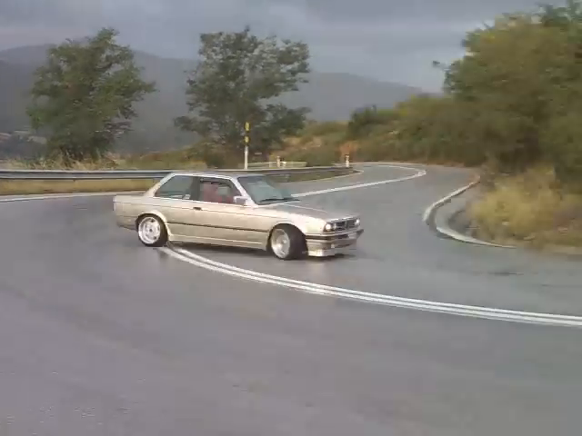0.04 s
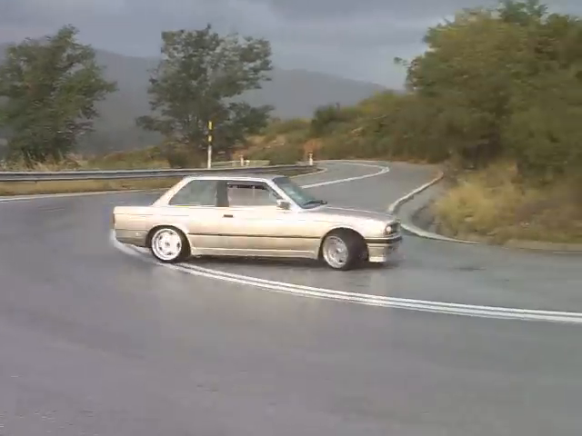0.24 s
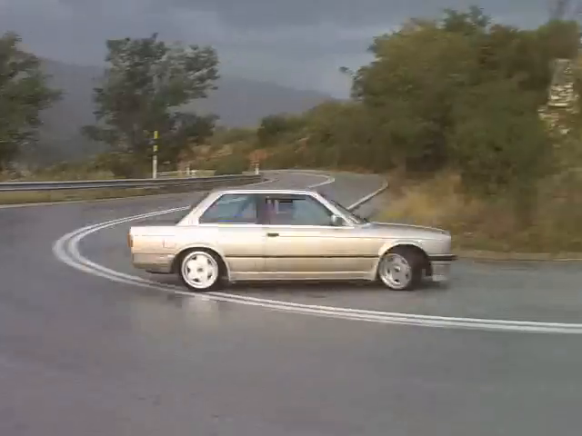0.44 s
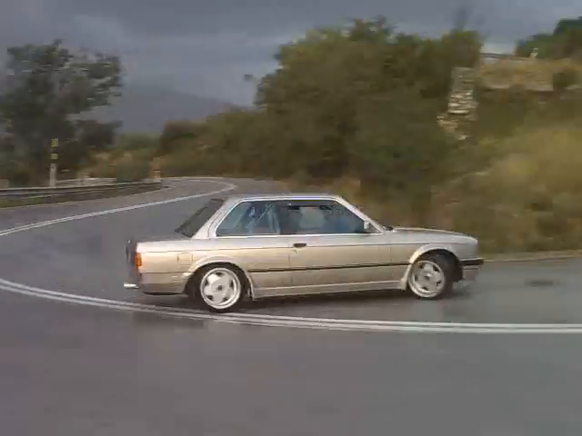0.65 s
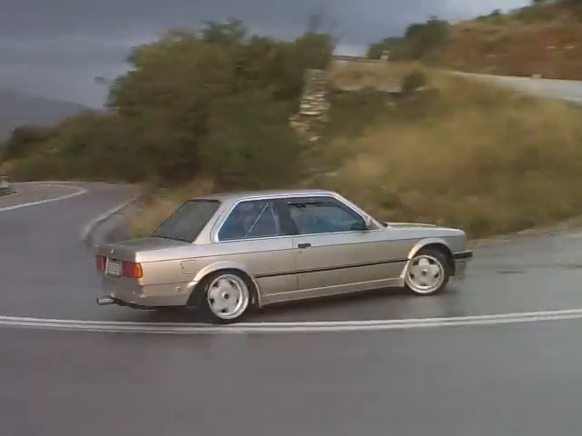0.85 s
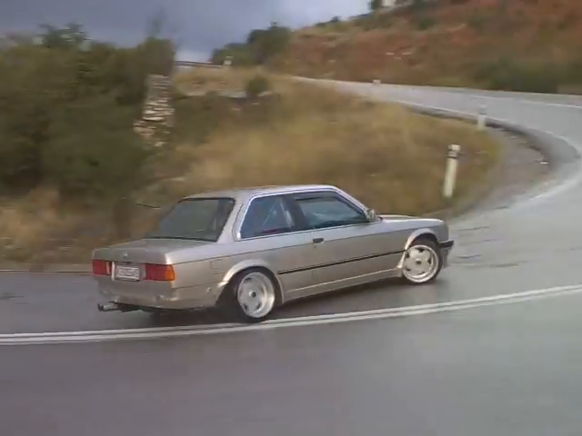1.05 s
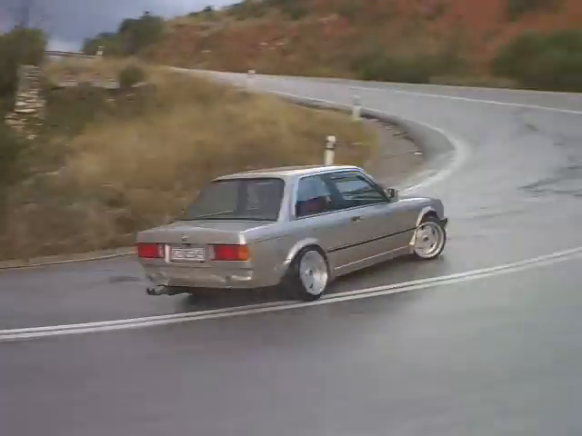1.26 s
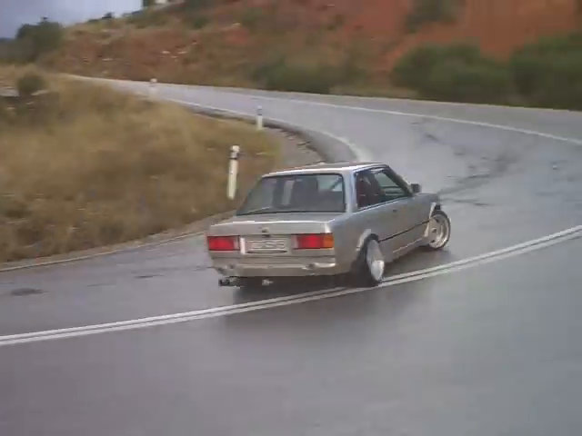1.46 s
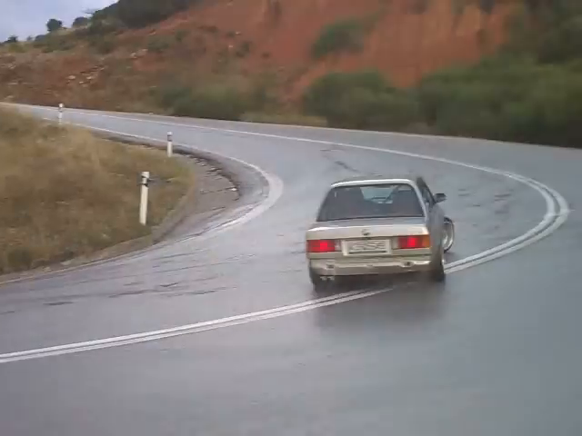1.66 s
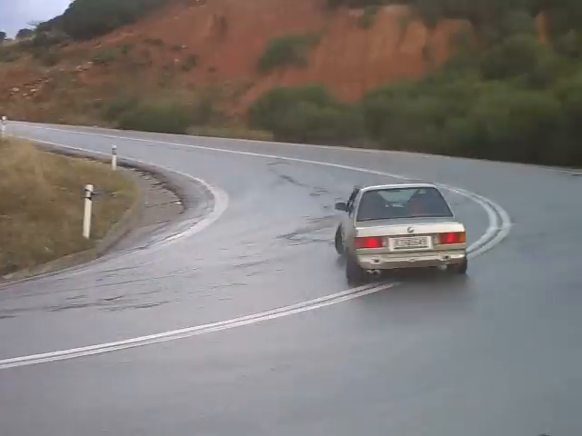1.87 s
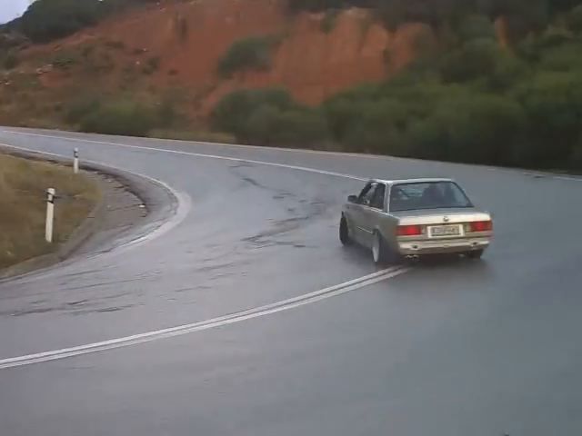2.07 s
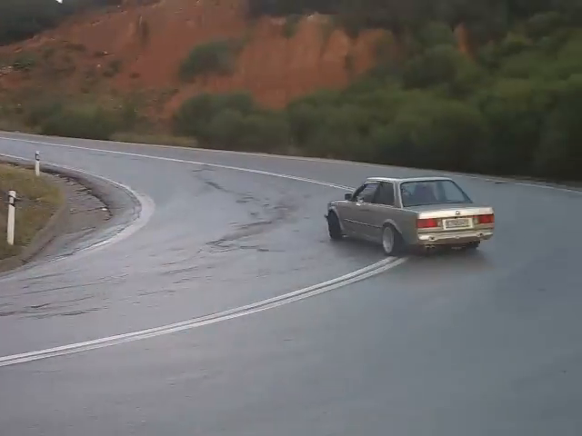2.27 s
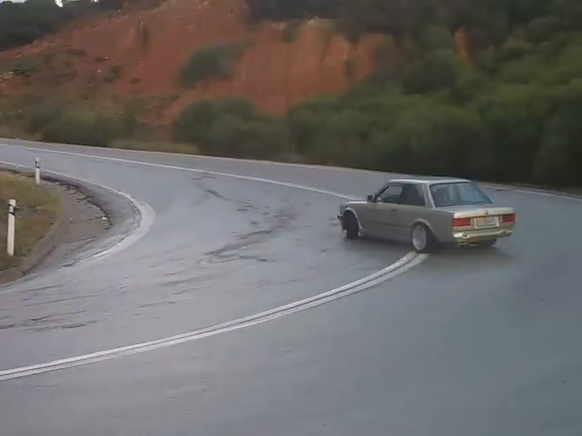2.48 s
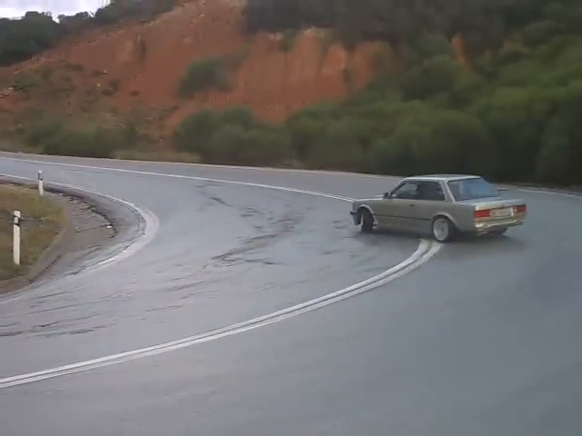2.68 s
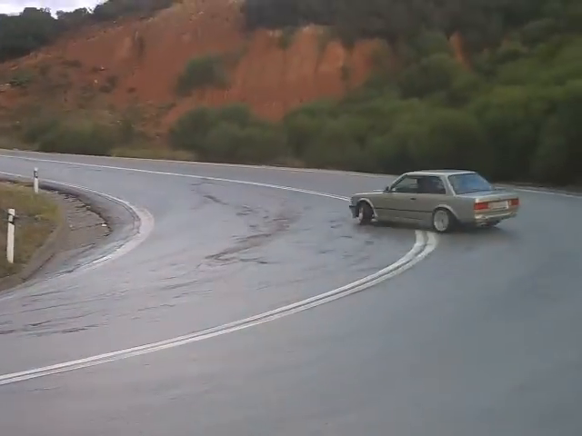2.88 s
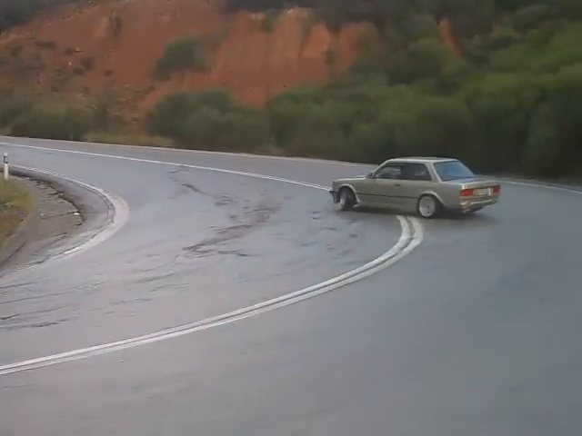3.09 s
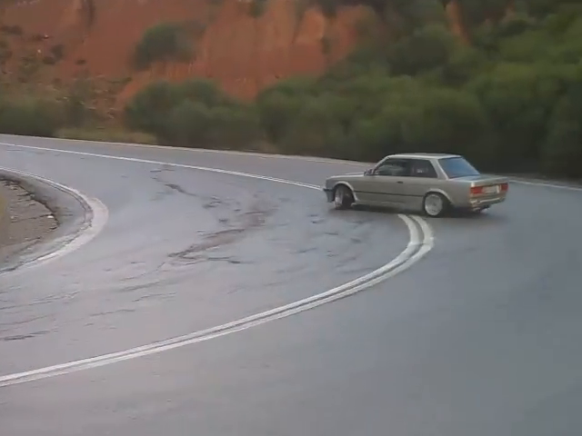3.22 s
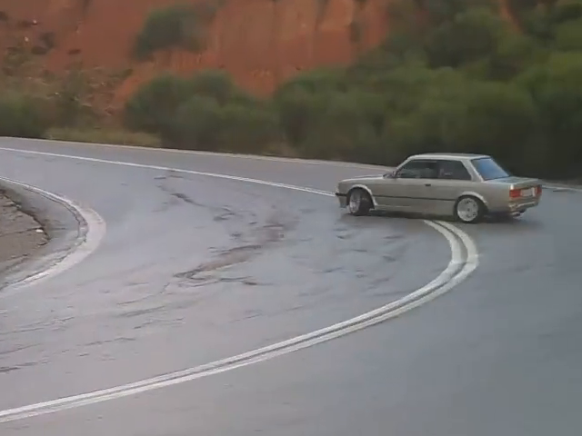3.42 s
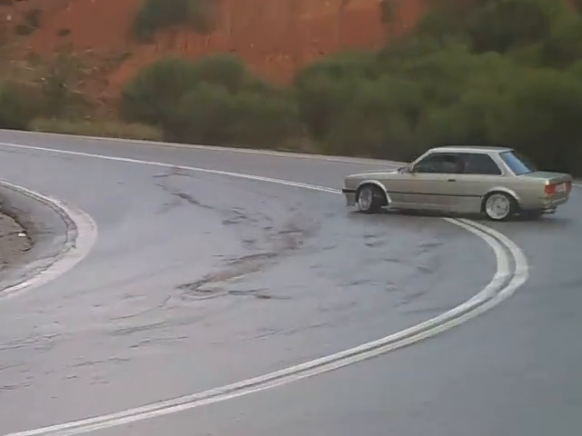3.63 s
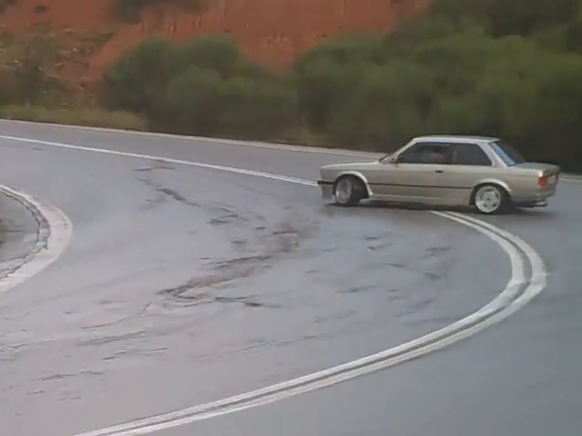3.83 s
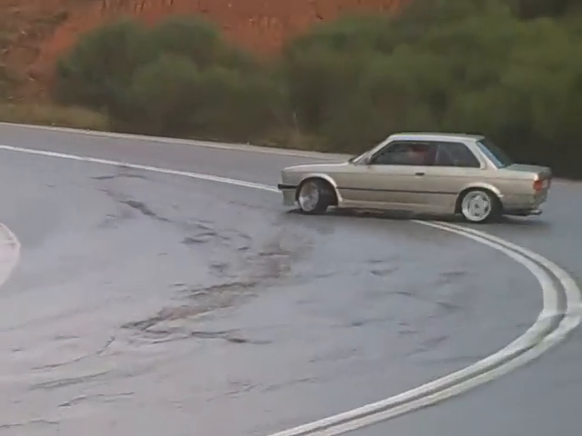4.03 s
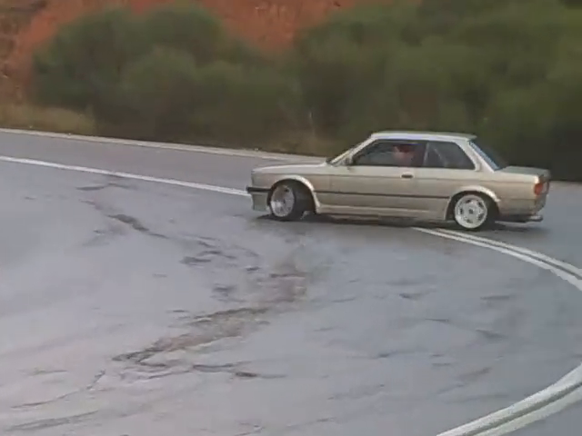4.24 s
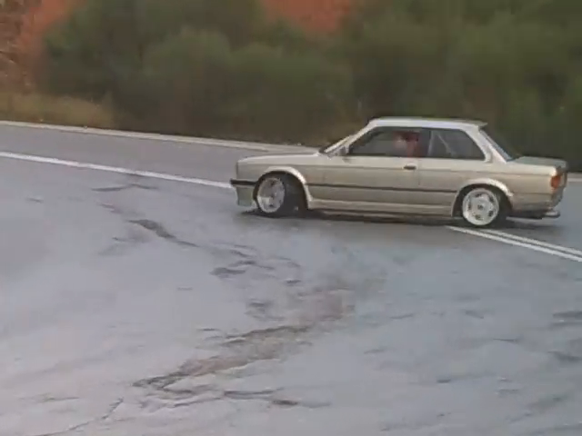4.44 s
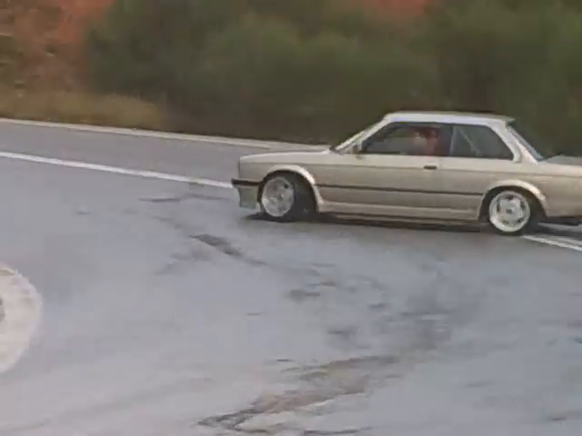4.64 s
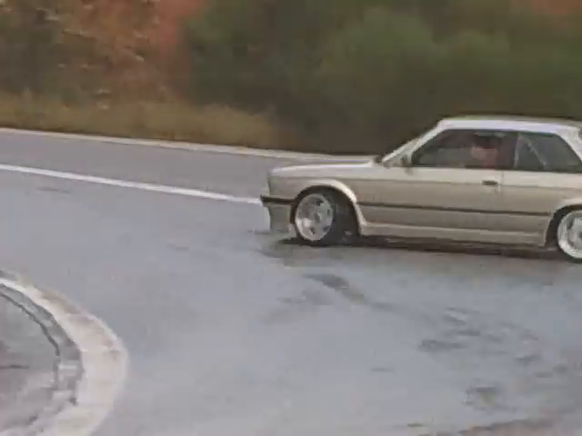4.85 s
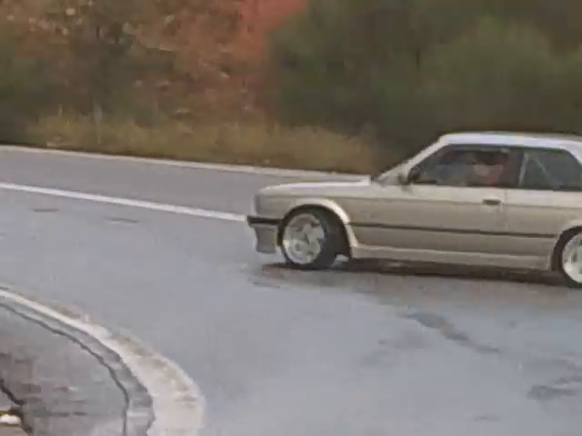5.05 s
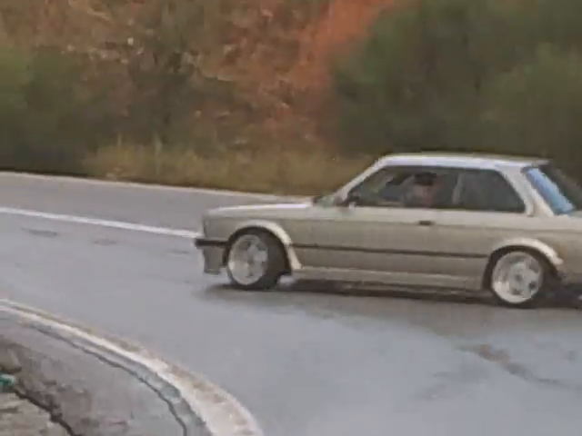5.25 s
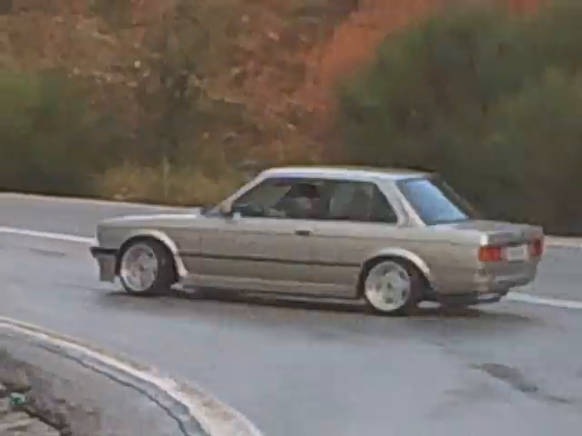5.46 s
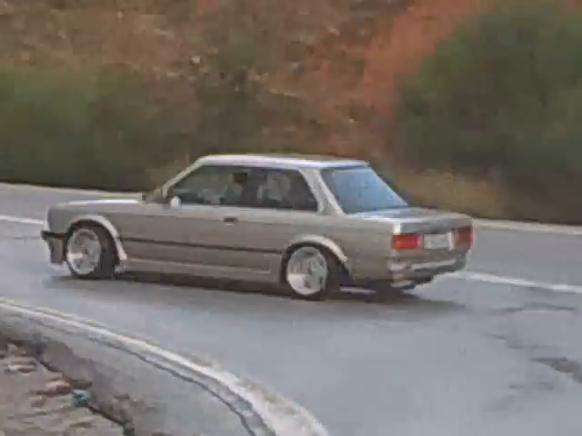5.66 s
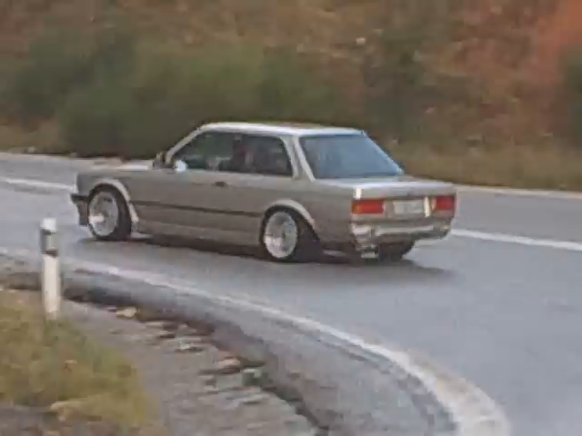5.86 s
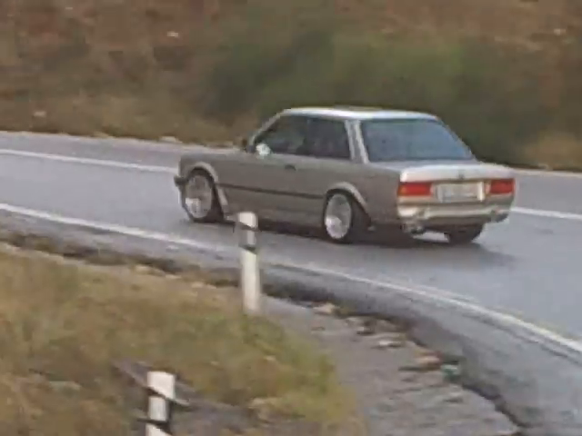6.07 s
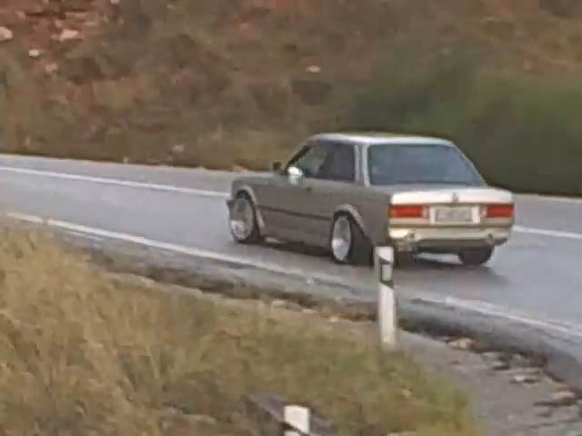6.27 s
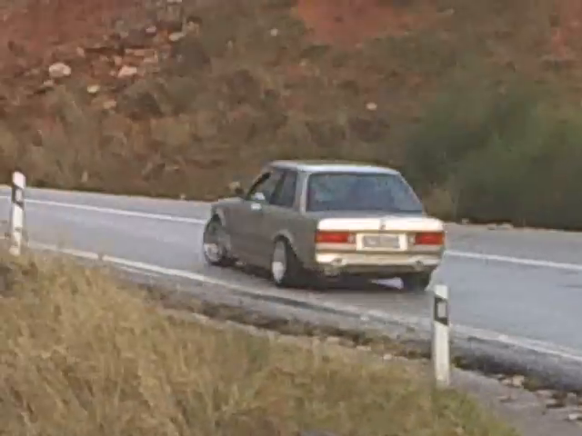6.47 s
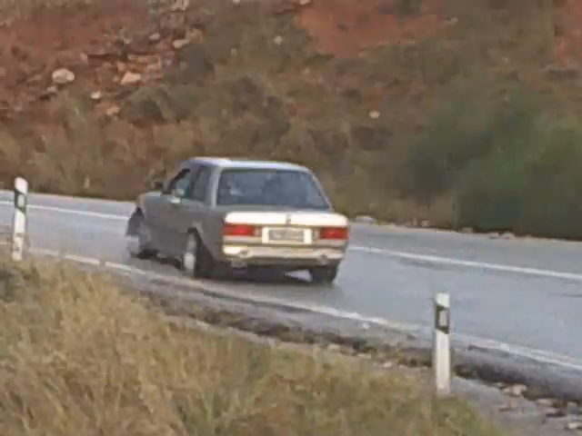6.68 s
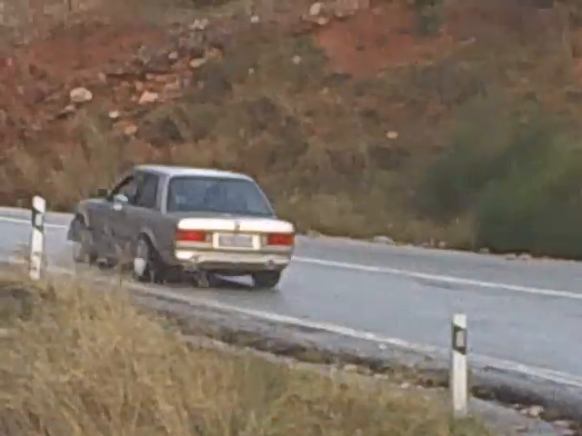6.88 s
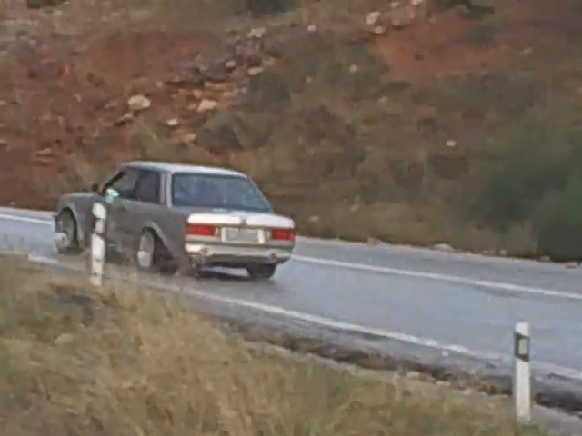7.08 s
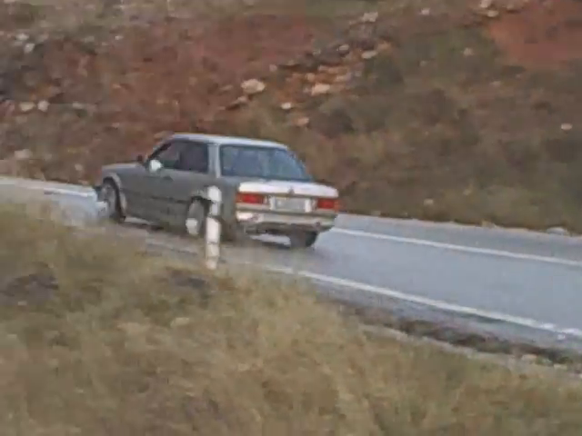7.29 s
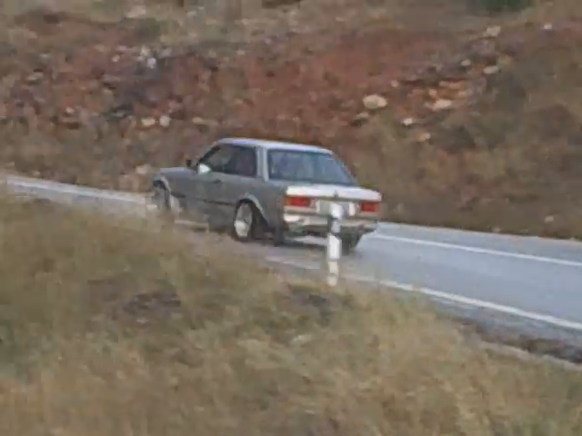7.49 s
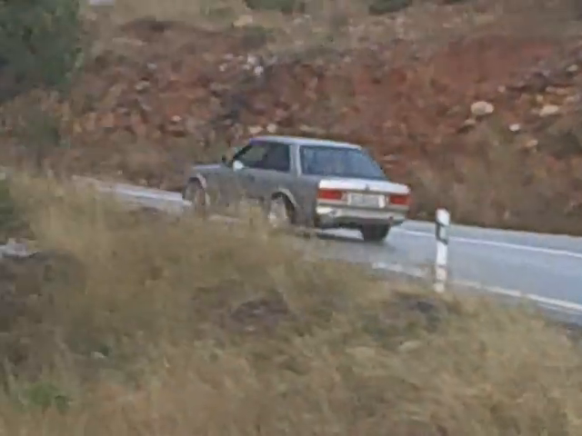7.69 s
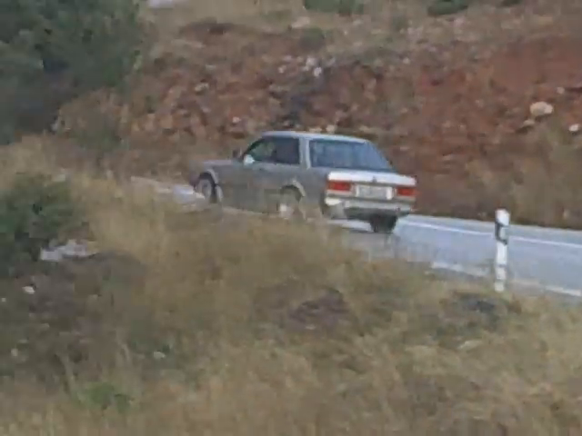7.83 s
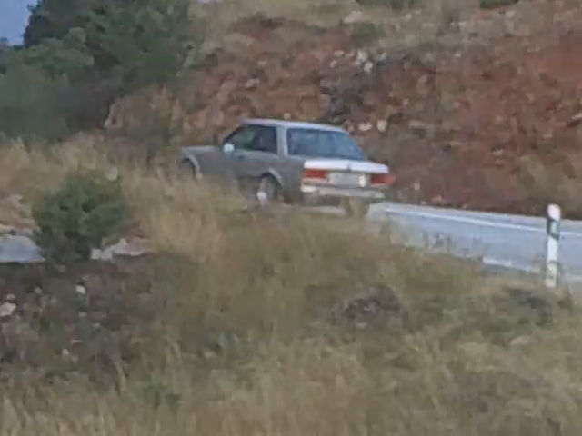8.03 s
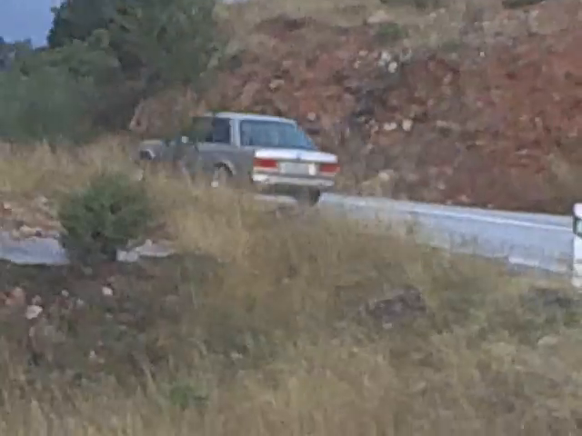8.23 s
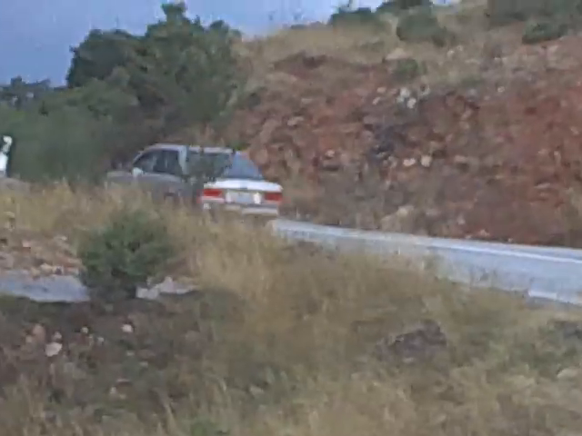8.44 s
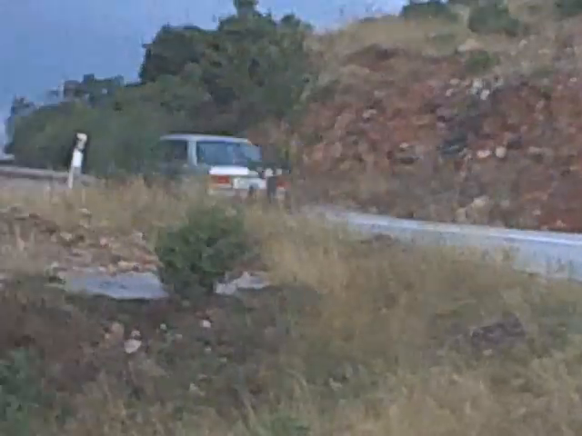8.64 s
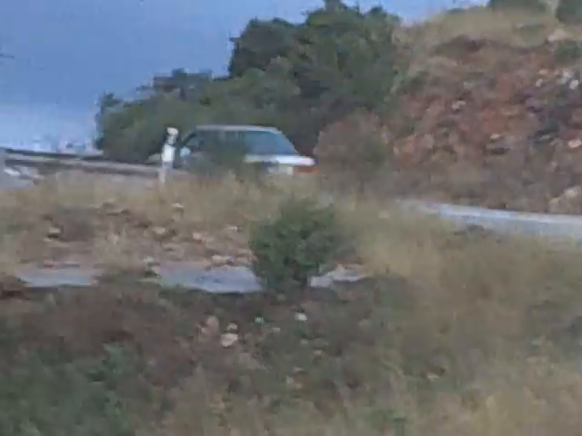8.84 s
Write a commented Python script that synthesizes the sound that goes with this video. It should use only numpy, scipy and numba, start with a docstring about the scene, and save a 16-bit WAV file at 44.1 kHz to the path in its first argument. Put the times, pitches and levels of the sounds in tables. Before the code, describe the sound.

A car drifts on a wet road, heard from the verge with dull treble and a faint outdoor echo. It opens with a short throttle blip and scrubbing tyres. From about 0.6 seconds the engine climbs with a booming, raspy exhaust, loudest between 1 and 1.8 seconds as it passes close, with tyre scrape, hissing spray and a low rumble. The exhaust sputters briefly near 1.9 seconds. Now further off, the revs dip around 2.6 seconds, climb to a peak at 3.6 with more scrubbing, then sputter and sink until 4.3. The engine rises again and holds high from about 5 to 6.5 seconds. Between 6.5 and 7.1 seconds the tyres squeal in rapid, stuttering bursts as the revs fall. From about 7.4 seconds the engine pulls gently at lower revs, quieter as the car drives away until nearly 9 seconds.

```python
"""A car drifts through a wet hairpin

A six-cylinder saloon revs up and down round the bend, then drives off uphill.
Its firings boom and rasp in the exhaust. The spinning tyres scrub and throw spray,
then squeal in bursts as they grip. The hillside gives a faint echo, and a small
camera on the verge hears it all without the high treble."""
import sys
import numpy as np
from scipy import signal
from scipy.fft import rfft, irfft
from scipy.io import wavfile
from scipy.ndimage import uniform_filter1d
from numba import njit

SR = 44100
rng = np.random.default_rng(int(sys.argv[2]) if len(sys.argv) > 2 else 0)


def pcm_store(signal):
    """Save signal as 16-bit PCM."""
    levels = np.round(np.clip(np.atleast_2d(signal), -1, 1) * 32767)
    wavfile.write(sys.argv[1], SR, levels.astype(np.int16).T)


N = 392931
TIME = np.arange(N) / SR


def undb(db):
    """Turn decibels into a gain."""
    return 10 ** (np.asarray(db) / 20)


def unit(x):
    """Scale a sound to an average (rms) level of 1."""
    return x / np.sqrt(np.mean(x ** 2))


def steady(x):
    """Even out slow changes, holding the level near 1."""
    return x / np.sqrt(uniform_filter1d(x ** 2, size=6000) + 1e-12)


def curves(table):
    """Join each column's values by straight lines in time."""
    seconds, *columns = np.transpose(table)
    return [np.interp(TIME, seconds, column) for column in columns]


def wobble(rate):
    """A random drift of size 1 that turns about rate times a second."""
    hold = max(int(SR / rate), 1)
    steps = np.repeat(rng.standard_normal(N // hold + 1), hold)
    return unit(uniform_filter1d(steps, hold)[:N])


def bursts(rows):
    """Bell-shaped swells. Each row: time in seconds, level in dB, half length in seconds."""
    power = sum(undb(2 * db) * np.exp(-np.minimum(((TIME - s) / half) ** 2, 60)) for s, db, half in rows)
    return np.sqrt(power)


def response(hz, spectrum):
    """Look up a spectrum's gain at the given frequencies."""
    points, db = np.transpose(spectrum)
    return undb(np.interp(np.log(hz), np.log(points), db))


def colour(x, spectrum):
    """Shape a sound's lows and highs with a spectrum."""
    hz = np.arange(N // 2 + 1) * SR / N + 1
    return irfft(rfft(x) * response(hz, spectrum), N)


@njit
def band_pass(x, hz, width):
    """Let through a band around a moving frequency."""
    y, band, low = np.empty(len(x)), 0., 0.
    for i in range(len(x)):
        tuning, damping = np.tan(np.pi * hz[i] / SR), width / hz[i]
        swing = (band + tuning * (x[i] - low)) / (1 + tuning * (tuning + damping))
        band = 2 * swing - band
        low += 2 * tuning * swing
        y[i] = damping * swing
    return y


def ring(x, hz, width):
    """A resonance: the same band filtered twice for steep sides."""
    centre = hz + np.zeros(N)
    return band_pass(band_pass(x, centre, float(width)), centre, float(width))


# Swells of the exhaust, under throttle or as the revs fall. Each row: start and release in seconds,
# then in dB: the note's first and last level, boom, snarl, and harmonics one and three against the note.
SWELLS = [(.14, .26, -27, -24.5, -28, -36, -2, 0.5), (0.587, 1.171, -19.5, -16.5, -22, -30.5, -7.5, 1),
          (1.107, 1.78, -7, -13, -22.5, -25, 1, -3), (1.966, 2.36, -20.5, -16, -32, -37.5, -4, -12.5),
          (2.44, 3.2, -27, -14.5, -31.5, -30, 1, -6.5), (3.173, 3.623, -22.5, -16.5, -25, -25, 1.5, 3),
          (3.753, 3.994, -29.5, -26, -33, -29, -6, -5.5),
          (4.308, 5.06, -26.5, -29.5, -35.5, -46, -3.5, -1.5),
          (5.027, 5.28, -16, -14.5, -30.5, -38, -2.5, -2.5), (5.3, 6.506, -22, -17, -32.5, -41, -2, -8.5),
          (6.724, 7.33, -31, -23, -35.5, -45, -0.5, -8.5), (7.38, 7.803, -24.5, -29, -42, -40, -0.5, -8.5),
          (7.795, 8.79, -34, -29.5, -43, -42, 3.5, -11)]


def swell_gain(first_db, last_db, coast_db):
    """Each swell rises quickly, leans from first to last, then fades to coasting."""
    rise_s, fade_s = .06, .041
    gain = undb(coast_db) + np.zeros(N)
    for (start, release, *_), first, last in zip(SWELLS, first_db, last_db):
        rise = np.clip((TIME - start) / rise_s, 0, 1)
        fade = np.exp(-np.clip((TIME - release) / fade_s, 0, 20))
        level = undb(np.interp(TIME, [start, release], [first, last]))
        gain = np.maximum(gain, rise * fade * level)
    return gain


def exhaust_gains(hz):
    """Note, boom and snarl swell together; high revs make the last two harsher."""
    _, _, first_db, last_db, boom_db, snarl_db, firing_db, third_db = np.transpose(SWELLS)
    note = [swell_gain(first_db + db, last_db + db, coast_db=-38.5 + np.mean(db))
            for db in (firing_db, 0, third_db, -17)]  # harmonics one to four
    harsh_from_hz, harsh_span_hz = 178.5, 35.3
    harsh = np.clip((hz - harsh_from_hz) / harsh_span_hz, 0, 1)
    boom = swell_gain(boom_db, boom_db, coast_db=-43) * undb(4 * harsh)
    snarl = swell_gain(snarl_db, snarl_db, coast_db=-44) * undb(12.5 * harsh)
    return note, boom, snarl


# How the exhaust pipe shapes the note. Each row: frequency in Hz, gain in dB.
PIPE = [(110, -13.5), (150, -16), (180, -16.5), (205, -8), (240, -6.5), (290, -2), (355, -1.5), (385, -3),
        (420, -3.5), (470, -17.5), (560, -22), (650, -15.5), (780, -9.5), (880, -17.5)]


def exhaust_note(hz, harmonics, gains):
    """Harmonics (multiples of the firing rate) sweep through the pipe's resonances."""
    return np.sqrt(2) * sum(gain * response(k * hz, PIPE) * wave.imag * undb(1.1 * wobble(12))
                            for k, (gain, wave) in enumerate(zip(gains, harmonics), 1))


# The six cylinders. Each row: pulse size in dB, shift in arrival time in seconds.
CYLINDERS = [(2, 0), (-3.5, .0003), (3, .00003), (-1, .00042), (0, -.00006), (-3, .00023)]


def firings(fired, scatter_db, jitter_s):
    """One pulse per firing: each cylinder has its own strength and path, plus a little chance."""
    number = np.arange(1, int(fired[-1]))
    db, lag = np.array(CYLINDERS)[number % len(CYLINDERS)].T
    chance = rng.standard_normal((len(number), 2))
    seconds = np.interp(number, fired, TIME) + lag + jitter_s * chance[:, 0]
    size = undb(db + scatter_db * chance[:, 1])
    at = np.clip(seconds, 0, TIME[-3]) * SR
    sample, share = at.astype(int), at % 1  # two samples share each pulse
    return np.bincount(sample, size * (1 - share), N) + np.bincount(sample + 1, size * share, N)


# The silencer's deep tone. Each row: frequency in Hz, gain in dB.
SILENCER = [(120, -29), (230, -12), (320, 2), (420, -3.5), (500, -9.5), (600, -16), (760, -39)]


def silencer_boom(fired, harmonics):
    """The uneven part of the pulses makes a lumpy boom."""
    pulses = firings(fired, scatter_db=3, jitter_s=.00007)
    even = sum(2 * np.real(uniform_filter1d(pulses / wave, size=2200) * wave) for wave in harmonics)
    return undb(-2.5) * steady(colour(pulses - even, SILENCER))


# The tailpipe's bright tone. Each row: frequency in Hz, gain in dB.
TAILPIPE = [(450, -37), (660, -17.5), (760, -3), (900, 1.5), (1020, 3), (1150, -10), (1350, -8),
            (1600, -19), (2000, -23.5), (2400, -11), (3200, -26.5)]


def tailpipe_snarl(fired):
    """The steep fronts of the pulses are more regular, and snarl."""
    fronts = firings(fired, scatter_db=1.4, jitter_s=.000045)
    return undb(-3) * steady(colour(fronts, TAILPIPE))


# Resonances of the gas. Each row: frequency in Hz, base width in Hz, gain in dB.
RATTLE = [(1015, 100, 2), (870, 160, -6), (1834, 240, -8.5), (2450, 380, -18)]


def gas_rattle(gas):
    """Rushing gas rattles in the tailpipe."""
    return steady(sum(undb(db) * ring(gas, hz, 1.28 * width) for hz, width, db in RATTLE))


# Engine speed. Each row: time in seconds, firings per second.
REVS = [(0, 123.8), (.15, 129.9), (.27, 146), (.55, 118), (.66, 123.2), (1.22, 180.2), (1.55, 200.7),
        (1.84, 212.2), (1.99, 188.2), (2.26, 200.5), (2.38, 194.2), (2.6, 159.7), (2.71, 160.8),
        (2.9, 177.6), (3.03, 182.7), (3.33, 208.8), (3.66, 220.9), (4.05, 165.9), (4.33, 123.1),
        (4.49, 131.5), (4.96, 172.3), (5.26, 192.7), (5.66, 195), (5.86, 186.3), (6.0, 193), (6.5, 203.7),
        (6.68, 164.6), (7.12, 138.5), (7.36, 109.4), (7.54, 113.8), (8.79, 134.8), (8.91, 162.2)]
# The car's way round the bend. Each row: time in seconds, distance in metres.
PATH = [(0, 15), (1.1, 6.73), (1.75, 11.6), (2.6, 22.7), (4.6, 31.8), (7.2, 33), (8.91, 56)]


def engine():
    """Firings drive the exhaust sounds; all but the sputter fade with distance."""
    hz, = curves(REVS)
    nearness = 7 / curves(PATH)[0]  # 1 at seven metres
    note_gains, boom_gain, snarl_gain = exhaust_gains(hz)
    fired = np.cumsum(hz * (1 + .003 * wobble(30))) / SR  # firings so far
    harmonics = [np.exp(2j * np.pi * k * fired) for k in (1, 2, 3, 4)]
    note = exhaust_note(hz, harmonics, note_gains)
    boom = boom_gain * silencer_boom(fired, harmonics)
    snarl = snarl_gain * tailpipe_snarl(fired)
    # gas puffs with each firing, hardest once in every round of the cylinders
    each_round = .42 + np.exp(-(fired / len(CYLINDERS) % 1) / .22)
    gas = rng.standard_normal(N) * np.exp(-(fired % 1) / .76) * each_round
    rattle = np.hypot(undb(-9) * snarl_gain, undb(-39.5)) * gas_rattle(gas)
    return nearness * (note + boom + snarl + rattle) + sputter(gas)


def tread_ring(hz, width, wander, flutter_db):
    """Tread blocks snap loose at random and ring the tyre at a wavering pitch."""
    slips = rng.standard_normal(N) * undb(2.7 * wobble(700))
    pitch = hz * (1 + wander * wobble(22))
    return steady(ring(slips, pitch, width)) * undb(flutter_db * wobble(70))


# The tread digs in. Each row: time in seconds, pitch in Hz, strength in dB, half length in seconds.
DIGS = [(0.051, 1113, -18, 0.061), (.31, 1160, -23.5, 0.02), (0.703, 1146, -12.5, 0.1),
        (0.946, 1200, -16.5, 0.045), (1.094, 1320, -16, 0.13), (1.503, 1110, -19, 0.055),
        (1.712, 1218, -16.5, 0.069), (1.983, 1223, -25.5, 0.18), (3.53, 1083, -32.5, 0.16),
        (3.79, 956, -32, 0.093), (5.15, 865, -54.5, 0.16), (6.3, 1350, -41.5, 0.23),
        (6.534, 1150, -30, 0.12), (6.873, 1024, -32, 0.21)]


def tyre_scrub(scrub_db):
    """Sliding tread rings at two pitches; the lower one swells as it digs in."""
    digging = bursts((s, db, half) for s, _, db, half in DIGS)
    low_gain = np.hypot(undb(-1) * digging, undb(scrub_db - 6.5))
    low = low_gain * tread_ring(curves(DIGS)[0], width=377, wander=.052, flutter_db=.5)
    high_gain = undb(scrub_db - 1.5 + 1.8 * wobble(14))
    return low + high_gain * tread_ring(1672, width=610, wander=.04, flutter_db=.94)


# Bright scrapes. Each row: time in seconds, pitch in Hz, level in dB, half length in seconds.
SCRAPES = [(.05, 1620, -17.5, .06), (0.293, 1864, -22, 0.036), (1.081, 2370, -25.5, 0.26),
           (3.44, 2364, -28, 0.073)]


def tyre_scrapes():
    """The tyres scrape where they spin hardest."""
    swell = bursts((s, db, half) for s, _, db, half in SCRAPES)
    return swell * tread_ring(curves(SCRAPES)[0], width=420, wander=.036, flutter_db=2)


# The tone of the spray. Each row: frequency in Hz, gain in dB.
SPRAY = [(200, -11.5), (450, -6.5), (650, -11), (900, 0), (1400, 0.5), (1950, -11), (2350, 5.5),
         (2800, 1.5), (3400, -1.5), (4200, -15.5)]


def spray(spray_db):
    """Water thrown off the tyres makes a flickering hiss."""
    hiss = unit(colour(rng.standard_normal(N), SPRAY))
    return hiss * undb(spray_db + .6 + 1.5 * wobble(90))


# How hard the tyres slide. Each row: time in seconds, scrub in dB, spray in dB.
SLIDE = [(0, -25, -25), (.35, -26.5, -25), (.65, -30, -26.5), (1.12, -23, -22), (1.35, -31, -30),
         (1.85, -36, -29.5), (2.2, -36.5, -39.5), (2.8, -41, -41), (3.2, -37.5, -44.5), (3.47, -32, -30),
         (4.1, -39, -42), (4.62, -54.5, -59), (5.1, -44, -50), (5.5, -43.5, -50.5), (5.9, -35, -50.5),
         (6.55, -37.5, -53), (6.74, -28, -39.5), (7.06, -37, -36.5), (7.28, -58, -53), (7.75, -59.5, -63.5),
         (8.91, -61, -69)]


def sliding_tyres():
    """Spinning tyres rub the wet asphalt and fling up water."""
    scrub_db, spray_db = curves(SLIDE)
    return tyre_scrub(scrub_db) + tyre_scrapes() + spray(spray_db)


# The tone of the rumble. Each row: frequency in Hz, gain in dB.
RUMBLE_TONE = [(20, -25.5), (45, -16.5), (80, -2), (110, -3), (150, -3), (300, 0), (500, -4.5), (720, -7),
               (950, -23), (3000, -38)]
# Its rise and fall. Each row: time in seconds, level in dB.
RUMBLE_LEVELS = [(0, -46.5), (.5, -43), (.77, -28.5), (1.75, -33), (2.4, -49), (3.55, -41.5), (4.3, -57),
                 (5.5, -53), (6.0, -48.5), (7.05, -49), (7.4, -58.5), (8.91, -64)]


def rumble():
    """A low, uneven rumble from the car swells and fades."""
    noise = unit(colour(rng.standard_normal(N), RUMBLE_TONE))
    return noise * undb(curves(RUMBLE_LEVELS)[0] + 2.2 * wobble(12))


# Exhaust sputters. Each row: time in seconds, level in dB, half length in seconds.
SPUTTERS = [(.22, -34.5, .04), (1.875, -30, 0.021), (2.49, -42.5, 0.044), (3.74, -35, 0.024),
            (3.86, -40.5, 0.052)]


def sputter(gas):
    """Gas sputters in the silencer as the throttle shuts."""
    return bursts(SPUTTERS) * steady(ring(gas, hz=368, width=150))


# The tyres bite. Each row: time in seconds, strength in dB.
SQUEALS = [(6.516, -19), (6.593, -21), (6.662, -12), (6.691, -16.5), (6.708, -11), (6.72, -8.5),
           (6.738, -9), (6.763, -8.5), (6.779, -11.5), (6.794, -17), (6.824, -12), (6.855, -16),
           (6.876, -11.5), (6.899, -10.5), (6.932, -16.5), (7.019, -8.5), (7.031, -11), (7.083, -5.5),
           (7.101, -12), (7.119, -19)]
# The squeal, harshest where it sags under load. Each row: time in seconds, pitch in Hz, overtones in dB.
SQUEAL_PITCH = [(6.52, 1128, -28), (6.66, 1025, -28), (6.715, 920.3, -7.5), (6.75, 968.4, -9),
                (6.81, 935, -24.5), (6.86, 1050, -25.5), (6.95, 997, -27), (7.03, 1085, -14),
                (7.12, 1075, -26)]


def squeal():
    """The tread sticks and slips in one unsteady tone; the hardest slips add overtones."""
    hz, overtone_db = curves(SQUEAL_PITCH)
    half_length_s = .0057
    swell = bursts((s, db, half_length_s) for s, db in SQUEALS)
    angle = 2 * np.pi * np.cumsum(hz * (1 + .01876 * wobble(350))) / SR
    second = np.sin(2 * angle + .33 * wobble(300))
    third = undb(-4.5) * np.sin(3 * angle + .57 * wobble(300))
    tone = undb(-2.5) * swell * (np.sin(angle) + undb(overtone_db) * (second + third))
    # between bursts the tread keeps singing raggedly
    singing = undb(-10) * tread_ring(hz, width=160, wander=.025, flutter_db=2)
    shrill = undb(-25) * tread_ring(2490, width=190, wander=.015, flutter_db=2)
    return tone + uniform_filter1d(swell, size=4400) * (singing + shrill)


def hillside_echo(x, fade_s):
    """Dense reflections die away by 60 dB in fade_s seconds."""
    echoes = rng.standard_normal(SR) * undb(-60 * TIME[:SR] / fade_s)
    return signal.fftconvolve(x, echoes / np.linalg.norm(echoes))[:N]


def scene():
    """The car and its faint echo."""
    car = engine() + sliding_tyres() + rumble() + squeal()
    return (car + undb(-21.5) * hillside_echo(car, fade_s=.27))[None]


def record(dry):
    """The camera loses the high treble; the loudest peaks overload it and crackle."""
    dull_hz, band_hz, top_hz, overload = 3526, 4253, 15800, .7
    dull = signal.sosfilt(signal.butter(7, dull_hz, fs=SR, output="sos"), dry)
    narrow = signal.sosfilt(signal.ellip(8, .2, 70, band_hz, fs=SR, output="sos"), dull)
    clipped = np.clip(narrow, -overload, overload)
    return signal.sosfilt(signal.ellip(8, .2, 70, top_hz, fs=SR, output="sos"), clipped)


dry = scene()
out = record(dry)
pcm_store(out)
```